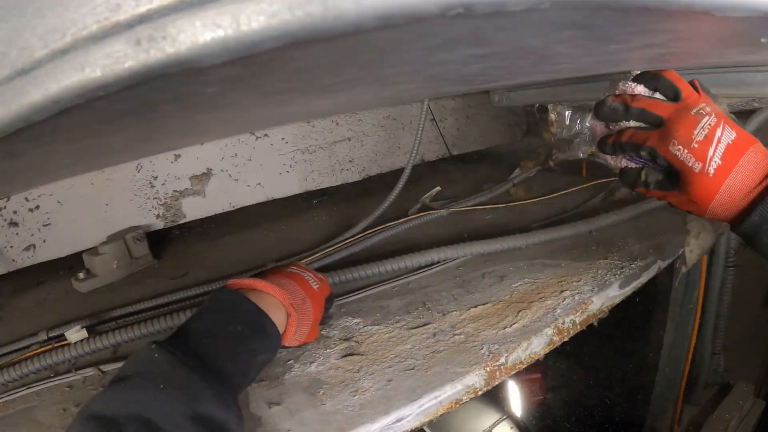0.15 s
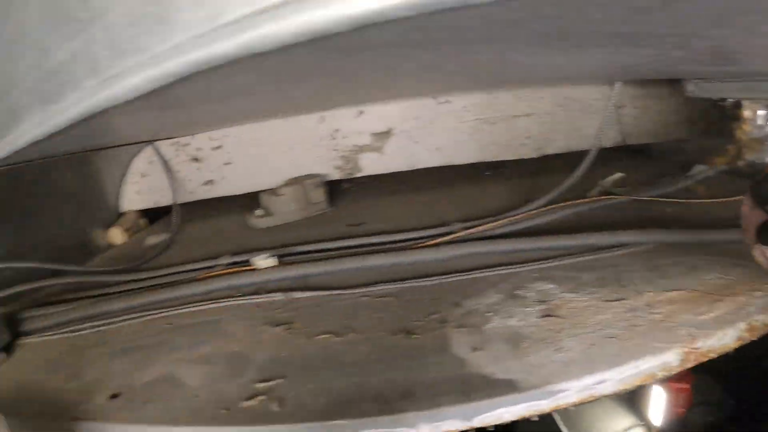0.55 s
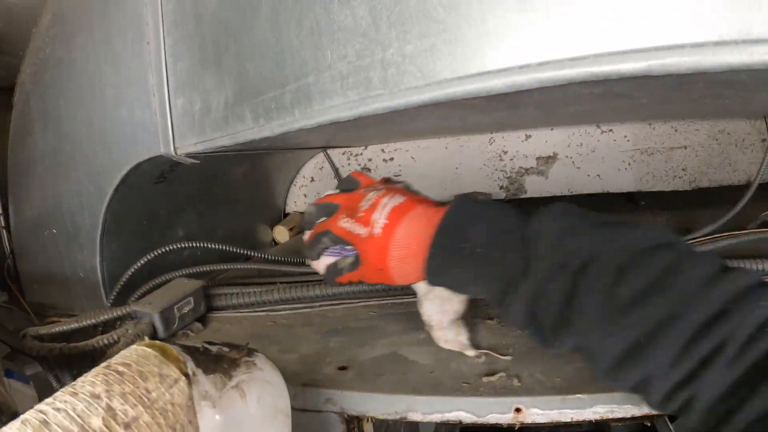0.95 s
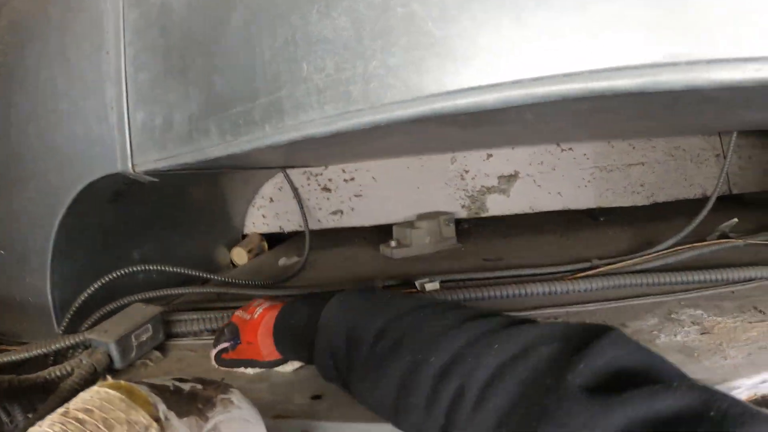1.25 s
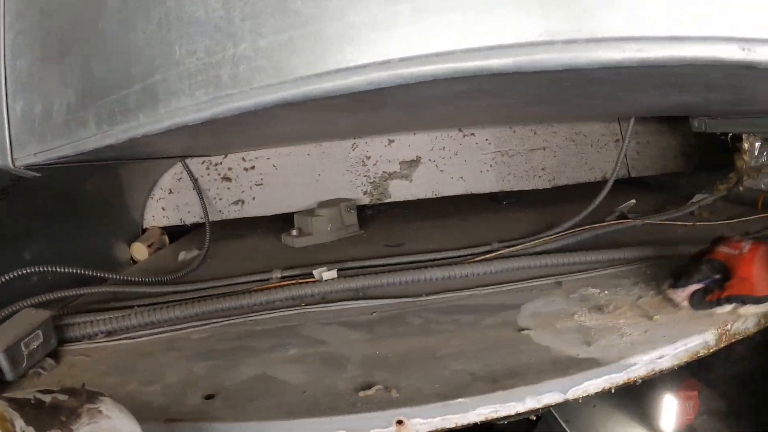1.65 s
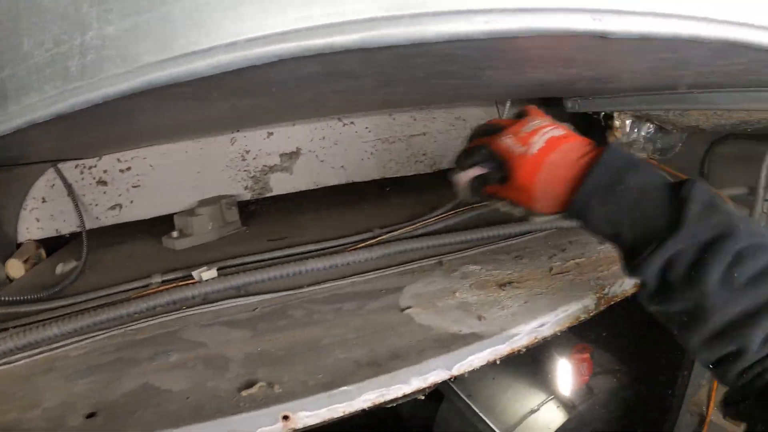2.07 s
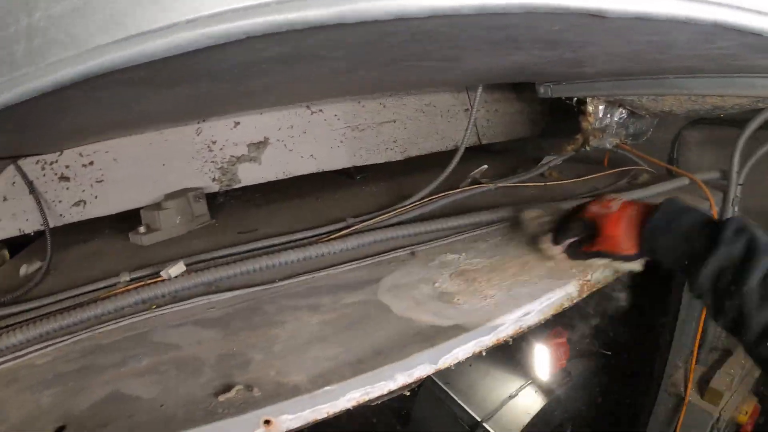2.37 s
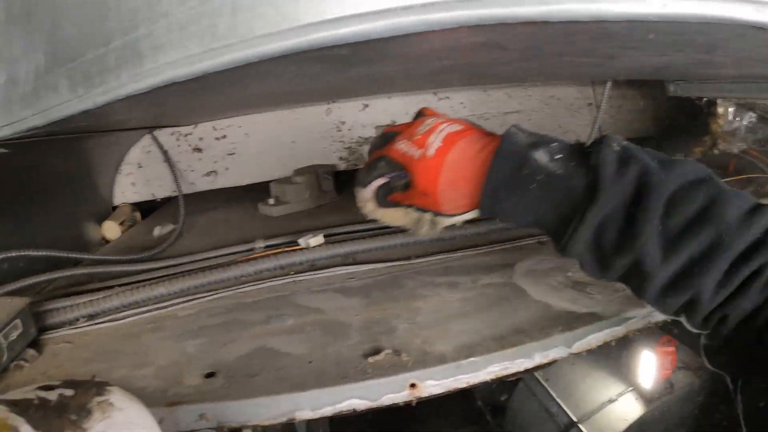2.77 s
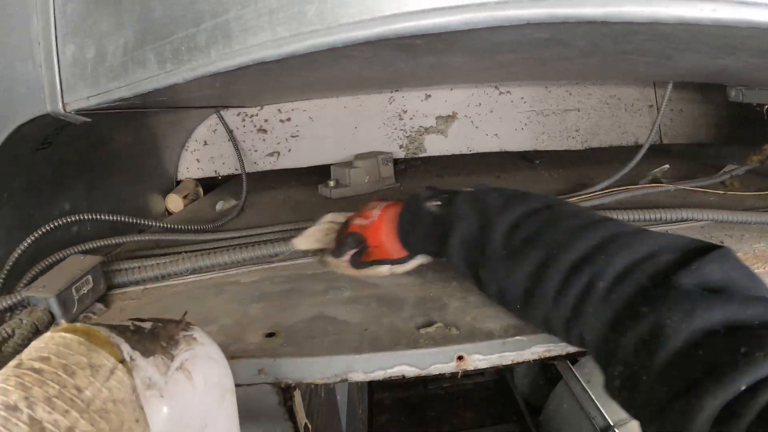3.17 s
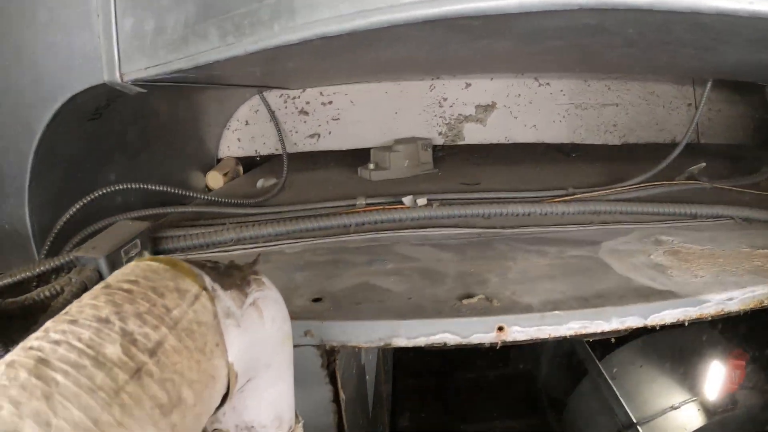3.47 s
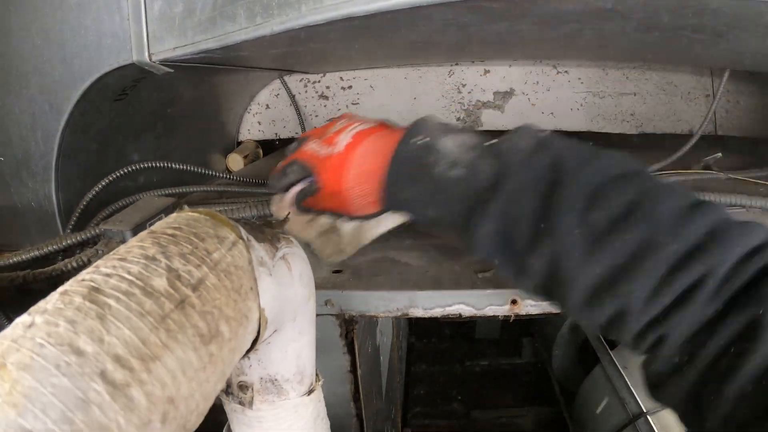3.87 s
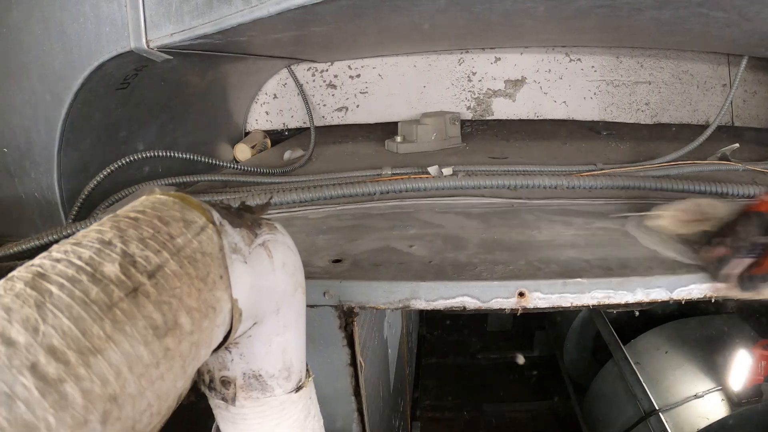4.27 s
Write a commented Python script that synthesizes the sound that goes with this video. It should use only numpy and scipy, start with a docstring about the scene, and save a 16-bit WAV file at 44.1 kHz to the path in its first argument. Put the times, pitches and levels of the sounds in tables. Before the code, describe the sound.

Four gritty cloth wipes on a thin metal deck, sleeve rustle, hollow pings and a brief rubbery squawk, above a steady deep building rumble.

```python
"""Building plant rumbles throughout. A sleeve rustles and a knuckle pings the sheet-metal deck of a large machine.
A gloved hand then scrubs a rag over the dusty deck in four swishing strokes: sliding fibres, modelled as random
tiny slips, hiss, and pressed grit excites the panel's resonances. Before, during and between strokes come rasps,
scuffs, knocks and gliding pings. After the second stroke the glove judders and squeals once, by stick-slip
through resonances. Reflections between metal walls follow each contact with the deck."""
import sys
import numpy as np
from scipy import signal
from scipy.fft import rfft, irfft, next_fast_len
from scipy.io import wavfile

SR = 44100
rng = np.random.default_rng(int(sys.argv[2]) if len(sys.argv) > 2 else 0)


def store_pcm(level_fs):
    """Save levels as 16-bit WAV."""
    pcm = np.round(np.clip(level_fs, -1, 1) * 32767).astype(np.int16)
    wavfile.write(sys.argv[1], SR, np.atleast_2d(pcm).T)


N = 194966
TIME = np.arange(N) / SR   # s
SIZE = next_fast_len(N + SR // 2)   # transform length, padded
HZ = np.maximum(np.arange(SIZE // 2 + 1) * SR / SIZE, 1)

# Event levels and resonance levels are relative: each source applies its own gains afterwards.
# Spectra give relative density, since the coloured noise is brought to an rms of 1.

# Plant rumble and moving air, spectra: (f/Hz, level/dB)
RUMBLE_SPECTRUM = [(9, -62), (15, -1), (29, 6), (45, 0.5), (60, -1), (82, -4), (100, -10), (130, -13.5),
                   (156, -26.5), (200, -24), (290, -31), (420, -37), (560, -43.5), (800, -53), (1500, -92)]
AIR_SPECTRUM = [(400, -19.5), (850, 3.5), (1300, 9), (2500, 2), (5000, -6), (7700, -9.5), (9000, -43.5),
                (15000, -58)]
# Swells of the upper rumble: (middle t/s, length/s, level/dB)
RUMBLE_SWELLS = [(.2, 0.75, -25), (3.45, 0.41, -26), (3.83, 0.27, -17.5), (4.15, 1, -28.5)]
RUMBLE_DEEP_DB, RUMBLE_UPPER_DB, AIR_DB = -26.5, -24, -60.5

# Sleeve and loose rag rustling as the arm moves: (middle t/s, length/s, level/dB)
SLEEVE_RUSTLES = [(.09, 0.2, -56.5), (.19, 0.13, -57), (.46, 0.13, -68), (.735, 0.061, -60),
                  (.88, 0.17, -63), (1.018, 0.14, -46), (1.13, 0.21, -49.5), (1.29, 0.28, -54),
                  (2.27, 0.31, -56.5), (2.69, 0.87, -55.5), (2.88, 0.15, -72), (3.06, 0.77, -55),
                  (3.125, 0.057, -51.5), (3.66, 0.92, -61.5), (4.07, 0.26, -58)]
# Rustling fabric, spectrum: (f/Hz, level/dB)
RUSTLE_SPECTRUM = [(300, -7), (750, 4), (1100, 8.5), (2000, 5.5), (4000, 1), (7700, -3), (8800, -13.5),
                   (12500, -21), (15500, -53)]
SLEEVE_REST_DB = -65.5   # the fabric is never quite still

# Knuckles and folds of cloth striking the deck, which rings less where the rag lies on it:
# (t/s, peak level/dB, lower band edge f/Hz, upper band edge f/Hz, ring level/dB)
KNOCKS = [(0.034, -33.5, 180, 330, -3.5), (0.973, -37, 4220, 5800, 1), (1.6455, -13.5, 1000, 4800, -1.5),
          (1.7, -23, 750, 1700, -5), (1.837, -22.5, 646, 1500, -4), (2.2115, -48, 6000, 13200, -3),
          (2.2687, -31, 3360, 5970, -1), (2.6447, -35, 4800, 9000, 3), (2.7787, -15, 2800, 6000, 4),
          (2.7947, -13, 624, 1680, -5.5), (2.8025, -22, 1100, 2600, -5), (2.8096, -18.5, 1700, 3100, -4),
          (2.829, -26, 800, 2200, 0), (3.39, -25.5, 280, 1300, -5), (3.4349, -11.5, 948, 3300, -7),
          (4.1, -38, 350, 898.6, -10)]
# Resonances of the deck: (f/Hz, width/Hz, level/dB)
PANEL_MODES = [(325, 60, -4), (395, 30, -8), (522, 28, -1), (626, 25, 3), (795, 35, 1), (940, 30, -3),
               (1010, 28, 0), (1197, 32, 0), (1585, 22, -3), (1755, 30, -3), (1853, 20, -3), (2068, 25, -5),
               (2333, 40, -1), (3003, 35, -1), (3420, 48, -2), (3880, 30, -4), (4660, 45, -3),
               (6255, 60, -6)]

# Flexing and pinging of the thin sheet:
# (t/s, level/dB, starting f/Hz, resting f/Hz, settling time constant/s, t60/s)
FLEXES = [(0.034, -49, 912, 1017, 0.014, 0.41), (1.135, -39, 980, 900, 0.012, 0.096),
          (2.783, -26.5, 2680, 2030, 0.026, 0.19), (2.7948, -25, 846, 602, 0.0119, 0.17),
          (2.798, -32, 1404, 1220, .02, 0.14), (2.802, -33, 540, 486, 0.017, .15),
          (2.816, -32, 3110, 2940, .035, 0.11)]
FLEX_ATTACK_S, FLEX_FLUTTER_DB = 0.0013, 3

# Rag catching on rough patches: (middle t/s, length/s, level/dB, starting f/Hz, final f/Hz, width/Hz)
RASPS = [(1.005, .09, -46.5, 1700, 2500, 1300), (1.153, .04, -49, 1700, 2000, 900),
         (1.57, 0.1, -39.5, 3500, 3750, 900), (1.668, .04, -43, 900, 950, 300),
         (1.724, 0.08, -33, 1130, 1000, 320), (1.77, 0.18, -38, 1600, 2090, 600),
         (1.78, 0.069, -35.5, 950, 1300, 300), (1.829, 0.065, -33, 755, 920, 220),
         (1.85, .06, -37.5, 1800, 2400, 1500), (2.46, .08, -38.5, 3800, 3500, 1500),
         (2.462, 0.075, -33, 1050, 1100, 400), (2.501, 0.031, -26.5, 1230, 1130, 250),
         (2.503, .04, -30, 1950, 1850, 400), (2.518, 0.06, -31.5, 820, 760, 160),
         (2.498, 0.12, -33, 517, 287, 200), (2.58, 0.19, -42, 328, 240, 200),
         (3.35, 0.041, -37.5, 290, 250, 120), (3.358, 0.18, -46, 3500, 3900, 1300),
         (3.412, 0.055, -39.5, 900, 880, 200), (3.494, 0.053, -34, 1700, 1200, 700),
         (3.521, 0.057, -32, 780, 1000, 600), (4.315, 0.065, -41, 1060, 980, 160),
         (4.336, 0.048, -33, 1200, 2400, 1100), (4.343, .25, -45.5, 3000, 3420, 900)]
# Sliding cloth, spectrum: (f/Hz, level/dB)
CLOTH_SPECTRUM = [(200, -4.5), (550, -3), (820, -3), (1050, 0.5), (1600, 1), (2500, -0.5), (3700, 1.5),
                  (5000, -3), (7700, -5.5), (8500, -13.5), (12500, -18), (14000, -28), (15700, -41)]

# Brief brushes of glove and rag: (t/s, level/dB, tilt/(dB per octave), time to fall 40 dB/s)
SCUFFS = [(0.987, -46, 0, 0.51), (1.143, -47, -10, 0.12), (1.645, -29, 2, 0.14), (1.934, -43, -6, 0.11),
          (1.994, -43.5, -3, 0.047), (2.04, -42.5, -3, 0.14), (2.107, -38.5, 1.5, 0.085),
          (2.296, -47, 2.5, 0.091), (2.333, -35, -6.5, 0.076), (2.61, -45, 7.5, 0.33),
          (2.7055, -36, 0, 0.14), (2.7752, -21.5, 0.5, 0.14), (2.794, -32.5, -12, 0.18),
          (3.432, -25.5, -7, 0.042), (3.474, -32.5, 7.5, 0.21), (3.695, -49, -5, 0.058),
          (3.765, -51.5, 18, 0.12), (4.096, -43, 2.5, 0.13), (4.408, -28.5, 1, 0.13)]

# Wipes from far left to near right:
# (start t/s, time to full speed/s, lift-off t/s, hiss level/dB, half-width of the sweep 0-1)
STROKES = [(1.324, .28, 1.877, -40, 0.9), (2.345, 0.14, 2.548, -39.5, 0.37), (3.14, 0.23, 3.55, -41, 0.72),
           (4.135, 0.25, 4.525, -43, 0.8)]
# The hand bearing down on the deck: (start t/s, time to full force/s, let-go t/s, scrub level/dB)
PRESSES = [(1.665, 0.053, 1.86, -30.5), (2.412, 0.098, 2.52, -28), (3.385, 0.12, 3.526, -31)]
# Dragged grit, spectrum: (f/Hz, level/dB)
GRIT_SPECTRUM = [(120, 5.5), (300, 1), (400, -3), (520, -4), (700, -4), (1100, -2), (1900, -1.5),
                 (2700, -8.5), (4000, -10), (5500, -24), (9000, -65), (15000, -40)]
LIFT_DB_PER_S, LET_GO_DB_PER_S = 504, 192   # decay rates of hiss and scrub
HAND_WEIGHT_DB = -5   # force from the resting weight of the hand, relative to the hiss gain
FIRM_CONTACT_DB = -32   # force above which the panel answers in full
PAN_DB, SWEEP_DB = 0.88, 0.84   # right-side gain at mid-wipe, and its swing for a place of 1; opposite on left

# The single stick-slip judder of the glove: (start t/s, time to full force/s, let-go t/s, level/dB)
JUDDER = [(2.9225, 0.0076, 2.943, -28)]
# Resonances it squawks through: (f/Hz, width/Hz, level/dB)
JUDDER_MODES = [(1090, 60, -5), (1210, 80, -7), (1600, 250, -14), (1900, 130, -4), (2150, 220, -9),
                (2530, 160, -7), (2950, 110, -10), (4070, 110, -8), (6150, 150, -11), (7640, 200, -11)]
# Slipping glove, spectrum: (f/Hz, level/dB)
SLIP_SPECTRUM = [(400, 0), (850, -1), (1200, -0.5), (2400, -1.5), (3000, -5), (3500, -3), (4500, -9),
                 (5200, -0.5), (7800, -3), (8600, -3.5), (11500, -6.5), (13500, -21), (15500, -44)]
JUDDER_FADE_DB_PER_S = 384
# Two resonances locking to the slipping glove: (starting f/Hz, final f/Hz, level/dB)
SQUEALS = [(1125, 1180, 2), (3000, 2990, -2)]
SQUEAL_HOLD_S, SQUEAL_JITTER_HZ, SQUEAL_FADE_DB_PER_S = 0.031, 61, 600

# The two microphone ports, likeness of left and right: (f/Hz, correlation 0-1)
PORT_LIKENESS = [(100, .998), (500, .975), (1000, .95), (2000, .9), (4000, .72), (8000, .7), (14000, .6)]
# Phase by which right leads: (f/Hz, phase/rad)
PORT_LEAD = [(30, .001), (300, 0.21), (1000, 0.76), (2000, 1.12), (4000, 0.96), (6500, 1.52), (12000, 0.48)]
# Left minus right: (f/Hz, level/dB)
PORT_BALANCE = [(100, 2.07), (400, 2.9), (1300, 2.4), (4000, 2.6), (8000, 0.33)]
CAVITY_T60_S = 0.096
CUTOFF_HZ = 15700


def from_db(db):
    """Amplitude gain is ten to the power of a twentieth of the level in decibels."""
    return 10 ** (np.asarray(db) / 20)


def rms_one(x):
    """Normalization: scale to an rms of 1."""
    return x / np.sqrt(np.mean(x ** 2) + 1e-20)


def at_hz(points):
    """Linear interpolation of a table on a logarithmic frequency axis."""
    hz, value = np.transpose(points)
    return np.interp(np.log(HZ), np.log(hz), value)


def filtered(x, response):
    """Linear filtering: multiply the spectrum by a frequency response."""
    return irfft(rfft(x, SIZE) * response, SIZE)[..., :N]


def band(x, low_hz, high_hz):
    """Causal band-pass filtering."""
    top_hz = np.clip(high_hz, low_hz * 1.2, SR * .45)
    sos = signal.butter(2, [low_hz, top_hz], "band", fs=SR, output="sos")
    return signal.sosfilt(sos, x + 1e-18)


def resonate(x, modes):
    """Modal superposition: parallel two-pole resonators of (f, width, level)."""
    out = 0
    for hz, width_hz, db in modes:
        r = np.exp(-np.pi * width_hz / SR)   # a wider resonance decays faster
        zeros = np.array([1, 0, -1]) * (1 - r * r) / 2
        poles = [1, -2 * r * np.cos(2 * np.pi * hz / SR), r * r]
        out = out + from_db(db) * signal.lfilter(zeros, poles, x + 1e-18)
    return out


def moving_resonance(x, hz, width_hz):
    """Heterodyning: shift the centre frequency to zero, low-pass, and shift back along the curve hz."""
    turn = np.exp(2j * np.pi * np.cumsum(hz) / SR)
    low_pass = signal.butter(2, width_hz / 2, fs=SR)
    return np.real(turn * signal.lfilter(*low_pass, x / turn))


def grains(per_s, spread_db):
    """Friction as a random process: two unrelated streams of tiny slips, random in moment and size."""
    born = rng.random((2, N)) < per_s / SR
    strength = from_db(spread_db * np.clip(rng.standard_normal((2, N)), -2, 2))
    return born * rng.standard_normal((2, N)) * strength


def spread(pair, spectrum):
    """Partial coherence: colour two unrelated streams and mix them to left and right, most alike in the bass."""
    alike = np.clip(at_hz(PORT_LIKENESS), 0, 1)
    mid, side = filtered(pair, from_db(at_hz(spectrum)) * np.sqrt([1 + alike, 1 - alike]))
    return rms_one(np.array([mid + side, mid - side]))


def wander(rate_hz):
    """Low-passed noise: a slow random curve with an rms of 1."""
    return rms_one(filtered(rng.standard_normal(N), 1 / (1 + (HZ / rate_hz) ** 2)))


def unevenness(rate_hz, depth_db):
    """Random amplitude modulation: a wandering gain with an rms of 1."""
    return rms_one(from_db(depth_db * wander(rate_hz)))


def gestures(rows, fade_db_per_s):
    """Envelope of (start, rise, end, level) rows: each eases in, holds, then decays exponentially."""
    out = 0
    for start, rise_s, end, db in rows:
        rise = np.sin(np.pi / 2 * np.clip((TIME - start) / rise_s, 0, 1))
        out = out + rise * from_db(db - fade_db_per_s * np.maximum(TIME - end, 0))
    return out


def swells(rows):
    """Envelope of (middle, length, level) rows: each rises and falls as a squared-cosine bell."""
    out = 0
    for middle, length, db in rows:
        phase = np.pi * np.clip((TIME - middle) / length, -.5, .5)
        out = out + from_db(db) * np.cos(phase) ** 2
    return out


def cavity(x, wet_db):
    """Reverberation: dense, decaying reflections between the metal walls, partly different at each port."""
    t = TIME[:SR // 2]
    own, shared = rng.standard_normal((2, len(t))), rng.standard_normal(len(t))
    reflections = band(shared, 140, 10000) + band(own, 2100, 11000)
    tail = reflections * from_db(-60 * t / CAVITY_T60_S) * (t > .0015)
    tail /= np.sqrt(np.sum(tail ** 2, axis=1, keepdims=True))   # unit energy at each port
    wet = signal.fftconvolve(x * np.ones((2, 1)), tail, axes=1)[:, :N]
    return x + from_db(wet_db) * wet


def building():
    """Broadband noise: plant rumble with a narrow-band, wavering throb, and a thin hiss of moving air."""
    rumble = spread(rng.standard_normal((2, N)), RUMBLE_SPECTRUM)
    deep = filtered(rumble, 1 / (1 + (HZ / 65) ** 4))
    upper = filtered(rumble - deep, 1 / (1 + (HZ / 190) ** 4))
    rest = rumble - deep - upper
    throb = rms_one(resonate(rumble, [(43.3, 4, 0)]))
    air = from_db(AIR_DB) * spread(rng.standard_normal((2, N)), AIR_SPECTRUM)
    deep_part = from_db(RUMBLE_DEEP_DB) * (deep + from_db(-10.5) * throb)
    upper_part = (from_db(RUMBLE_UPPER_DB) + swells(RUMBLE_SWELLS)) * upper
    return deep_part + upper_part + from_db(-21.5) * rest + air


def sleeve():
    """Crumpling: fabric creases in many tiny random events while the arm travels."""
    creases = grains(per_s=6000, spread_db=3) * unevenness(rate_hz=40, depth_db=1)
    return (from_db(SLEEVE_REST_DB) + swells(SLEEVE_RUSTLES)) * spread(creases, RUSTLE_SPECTRUM)


def knocks():
    """Impact excitation: the softness of a short gloved push sets its band, and the deck rings in response."""
    pushes, ringing = np.zeros((2, N))
    for s, db, low_hz, high_hz, ring_db in KNOCKS:
        push = band(signal.unit_impulse(SR // 20), low_hz, high_hz)
        push = from_db(db) * push / np.abs(push).max()
        start = int(s * SR)
        pushes[start:start + len(push)] += push
        ringing[start:start + len(push)] += from_db(ring_db) * push
    return cavity(pushes + from_db(9) * resonate(ringing, PANEL_MODES), wet_db=-6)


def flexes():
    """Changing stiffness: a pushed spot of thin sheet pings, its pitch gliding to rest as the bend relaxes."""
    age = TIME[:SR // 2]
    out = np.zeros(N + len(age))
    for s, db, from_hz, rest_hz, settle_s, t60 in FLEXES:
        hz = rest_hz + (from_hz - rest_hz) * np.exp(-age / settle_s)
        shape = (1 - np.exp(-age / FLEX_ATTACK_S)) * from_db(db - 60 * age / t60)
        start = int(s * SR)
        out[start:start + len(age)] += shape * np.sin(2 * np.pi * np.cumsum(hz) / SR)
    flutter = unevenness(rate_hz=130, depth_db=FLEX_FLUTTER_DB)
    return cavity(out[:N] * flutter, wet_db=-9.5)


def rasps():
    """Friction-driven resonance: coarse slips on a rough patch feed one resonance, which moves with the grip."""
    slips = spread(grains(per_s=2500, spread_db=2.0), CLOTH_SPECTRUM)
    out = 0
    for s, length, db, from_hz, to_hz, width_hz in RASPS:
        hz = np.interp(TIME, [s - length / 2, s + length / 2], [from_hz, to_hz])
        out = out + swells([(s, length, db)]) * rms_one(moving_resonance(slips, hz, width_hz))
    return cavity(out, wet_db=-9.5)


def scuffs():
    """Transient friction: each brush bites at once and decays exponentially, leaving the deck ringing."""
    rub = spread(grains(per_s=20000, spread_db=1.5), CLOTH_SPECTRUM)
    octaves = np.log2(np.clip(HZ, 1000, 8000) / 3000)   # the tilt acts from 1 to 8 kHz
    out = 0
    for s, db, tilt_db, length in SCUFFS:
        age = np.maximum(TIME - s, 0)
        shape = (1 - np.exp(-age / .0008)) * from_db(-40 * age / length)
        out = out + from_db(db) * shape * rms_one(filtered(rub, from_db(tilt_db * octaves)))
    ring = resonate(band(out, 850, 12000), PANEL_MODES)
    return cavity(from_db(-2.3) * out + ring, wet_db=-14)


def hand():
    """Kinematics: the hand wipes to the right and travels back in between; gives hiss gain, force and place."""
    slide = gestures([row[:4] for row in STROKES], LIFT_DB_PER_S)
    force = np.hypot(gestures(PRESSES, LET_GO_DB_PER_S), from_db(HAND_WEIGHT_DB) * slide)
    turns = []
    for start, _, lift, _, reach in STROKES:
        turns += [(start, -reach), (lift, reach)]
    return slide, force, np.interp(TIME, *np.transpose(turns))


def wall_echo(x, place):
    """Comb filtering: the duct overhead returns an echo sooner as the hand nears, so the swish sweeps upward."""
    delay_s = 0.0026 * from_db(-2.5 * place)
    echo = np.array([np.interp(TIME - delay_s, TIME, side) for side in x])
    return x + 0.14 * echo


def wiping():
    """Sliding friction: fibres hiss all along a stroke; under pressure coarser grit catches and rings the deck."""
    fibres = grains(per_s=20000, spread_db=2) * unevenness(rate_hz=60, depth_db=.9)
    dust = grains(per_s=6000, spread_db=1.5) * unevenness(rate_hz=90, depth_db=1.4)
    hiss, grit = spread(fibres, CLOTH_SPECTRUM), spread(dust, GRIT_SPECTRUM)
    scrub = rms_one(grit + from_db(3) * resonate(grit, PANEL_MODES))
    slide, force, place = hand()
    # a light touch mostly hisses: the panel answers once the hand bears down
    press = force ** 2 / np.hypot(force, from_db(FIRM_CONTACT_DB))
    swish = wall_echo(from_db(5.0) * slide * hiss + from_db(3.5) * press * scrub, place)
    pan = from_db((PAN_DB + SWEEP_DB * place) * np.array([[-1], [1]]))
    return cavity(swish * pan, wet_db=-20.0)


def judder():
    """Stick-slip: rapid uneven slips of the rubber grip squawk through metal resonances and clatter off walls."""
    slips = spread(grains(per_s=4000, spread_db=0.5), SLIP_SPECTRUM)
    slips = gestures(JUDDER, JUDDER_FADE_DB_PER_S) * slips
    squawk = resonate(slips, JUDDER_MODES)
    return cavity(from_db(-4) * slips + from_db(10.5) * squawk, wet_db=-8.5)


def squeal():
    """Mode locking: slips of the rubber grip sustain two rough tones, which bend and jitter in pitch."""
    start, rise_s, _, db = JUDDER[0]
    end = start + SQUEAL_HOLD_S
    out = 0
    for from_hz, to_hz, tone_db in SQUEALS:
        hz = np.interp(TIME, [start, end], [from_hz, to_hz]) + SQUEAL_JITTER_HZ * wander(300)
        tone = np.sin(2 * np.pi * np.cumsum(hz) / SR)
        out = out + from_db(tone_db) * unevenness(rate_hz=160, depth_db=1.5) * tone
    return cavity(gestures([(start, rise_s, end, db)], SQUEAL_FADE_DB_PER_S) * out, wet_db=-9)


def scene():
    """Superposition: the sources add, then right leads in phase and left is a little louder."""
    background = building() + sleeve()
    contacts = knocks() + flexes() + rasps() + scuffs() + wiping() + judder() + squeal()
    left, right = background + contacts
    offset = from_db(at_hz(PORT_BALANCE) / 2) * np.exp(-.5j * at_hz(PORT_LEAD))
    return np.array([filtered(left, offset), filtered(right, 1 / offset)])


def record(dry):
    """Band limiting: an elliptic low-pass cuts the top steeply."""
    return signal.sosfilt(signal.ellip(10, .1, 90, CUTOFF_HZ, fs=SR, output="sos"), dry)


dry = scene()
out = record(dry)
store_pcm(out)
```